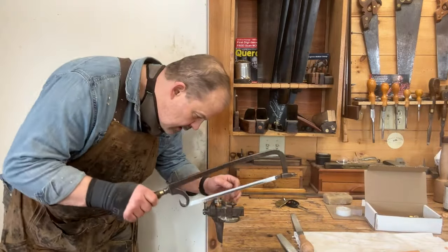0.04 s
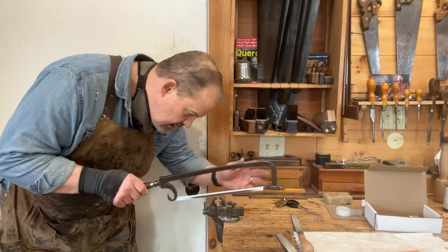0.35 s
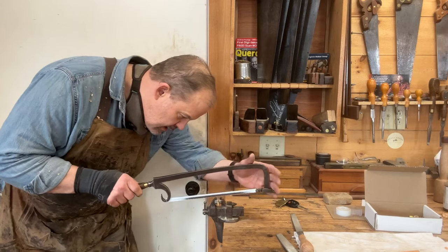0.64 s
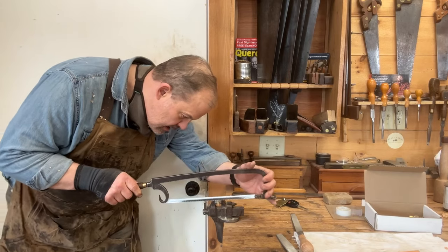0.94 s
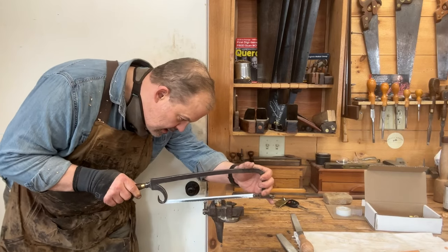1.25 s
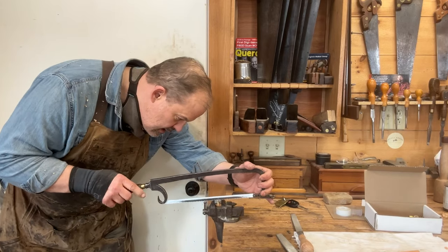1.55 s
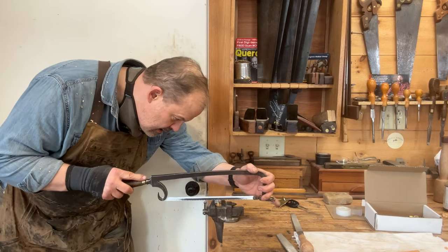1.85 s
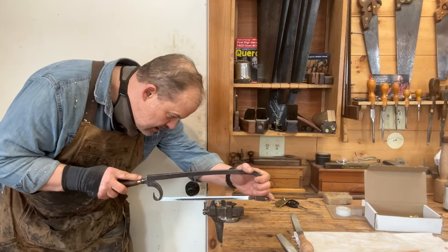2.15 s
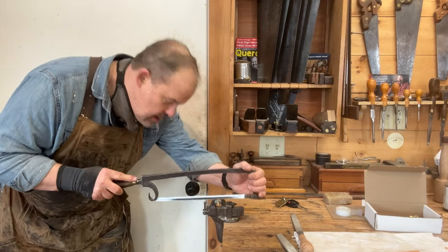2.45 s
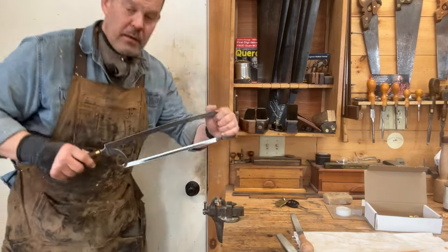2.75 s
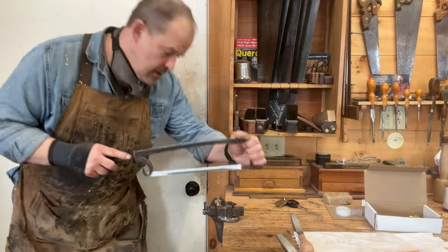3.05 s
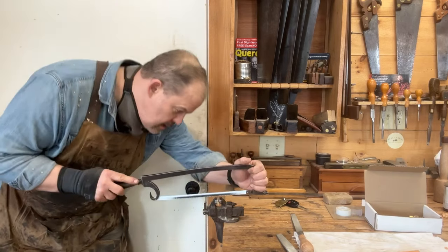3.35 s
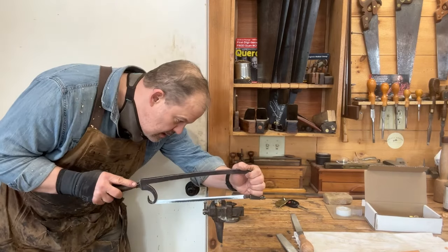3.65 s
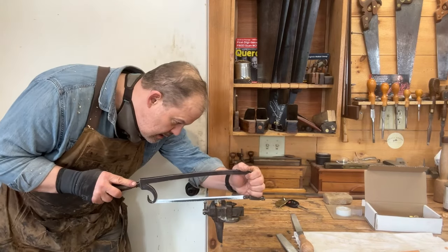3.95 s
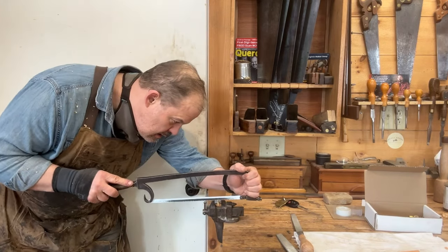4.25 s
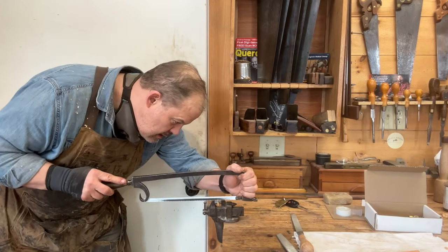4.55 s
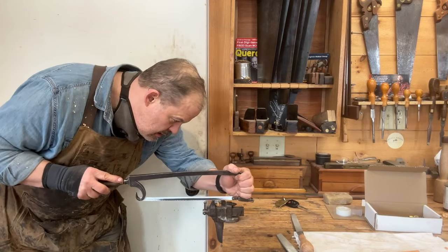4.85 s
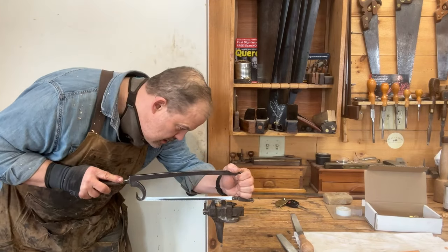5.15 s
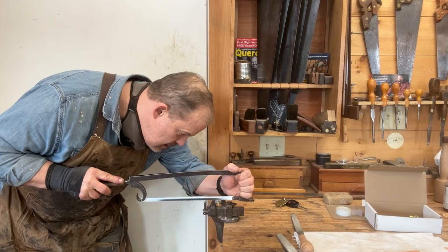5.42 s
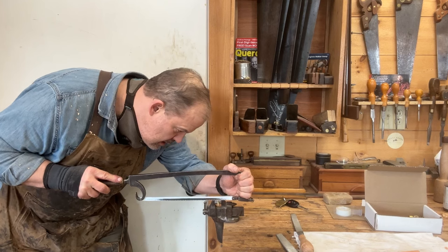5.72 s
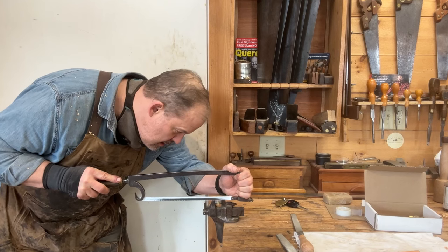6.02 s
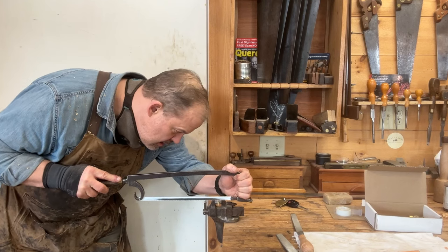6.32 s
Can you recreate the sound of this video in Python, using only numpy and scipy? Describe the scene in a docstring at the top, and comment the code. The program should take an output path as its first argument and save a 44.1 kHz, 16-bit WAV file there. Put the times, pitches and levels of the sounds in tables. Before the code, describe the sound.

In a small workshop, clothes rustle faintly while rubber soles squeak low and a step thumps on floorboards. A hacksaw makes a few quiet scrapes on metal in a vise, then knocks lightly. Another firm, squeaky step follows, and the sawing resumes in short, uneven strokes with little clinks. The steps are much louder than the saw, all heard close up over faint room air.

```python
"""A hacksaw cuts a small brass piece in a bench vise, in short careful strokes, in a wooden workshop.
The teeth catch irregularly, ring frame, vise and blade, and shake the bench. At times the saw knocks
against the vise or the blade snags. The sawyer shifts his stance: clothes rustle and tick, rubber
soles stick and slip, slap the floor and ring the boards. A close microphone pair hears it with the
room and its faint steady air."""
import sys
import numpy as np
from scipy import signal
from scipy.fft import rfft, irfft, next_fast_len
from scipy.io import wavfile
from scipy.ndimage import uniform_filter1d

SR = 44100
rng = np.random.default_rng(int(sys.argv[2]) if len(sys.argv) > 2 else 0)


def waveform_to_disk(signal):
    """Save audio, clipped to [-1, 1], as 16-bit WAV at the path in sys.argv[1]."""
    frames = np.transpose(np.atleast_2d(signal))
    scaled = np.clip(frames, -1, 1) * 32767
    samples = np.round(scaled).astype(np.int16)
    wavfile.write(sys.argv[1], SR, samples)


N = 281358

# Table levels are relative; layer gains follow.
# still shop air: f/Hz, level/dB
AIR_SPECTRUM = [(20, -8), (60, 0), (100, 0), (180, -11), (400, -11), (700, -17), (1200, -17), (1650, -15),
                (2050, -16), (2400, -22), (3200, -29), (6000, -31), (10000, -38), (15000, -48)]
# sliding cloth and shoes: t/s, attack/s, hold/s, release/s, level/dB, sheen/dB re level
RUSTLE_MOVES = [(0.444, 0.0263, 0.058, .11, -52.5, -8.5), (.645, 0.023, 0.03, 0.15, -64.5, -9.5),
                (.942, 0.0093, 0.0065, 0.089, -57.5, -12.5), (0.995, 0.085, 0.074, .04, -52.5, -7.5),
                (1.245, 0.063, 0.12, 0.12, -68, -12.5), (1.44, 0.029, 0.025, 0.19, -63.5, -13.5),
                (1.47, 0.078, .12, 0.068, -69.5, -5), (1.722, 0.17, 0.075, 0.17, -79, -17),
                (2.38, 0.023, 0.032, 0.32, -72.5, -7), (2.449, 0.18, 0.19, 0.13, -68, -7),
                (2.853, 0.036, 0.037, 0.14, -60, -6), (2.99, 0.076, 0.041, 0.066, -55, -1.5),
                (3.265, .06, 0.03, 0.24, -60, -8), (3.39, 0.025, 0.023, 0.064, -76, -7),
                (4.818, 0.044, 0.014, 0.21, -67, -13), (5.467, 0.026, 0.057, 0.065, -70.5, -7)]
# cloth rubbing: f/Hz, level/dB
CLOTH_SPECTRUM = [(40, 13.5), (110, 13.5), (180, 5.5), (280, 13), (550, 3), (1000, 4.5), (2500, 0.5),
                  (4500, -4), (7000, -10), (10000, -32.5)]
# treble sheen of the cloth: f/Hz, level/dB
SHEEN_SPECTRUM = [(3000, -23), (6500, -16.5), (9000, -2), (10500, -7.5), (12000, -18), (15000, -15)]
# apron and handle ticks: t/s, level/dB, decay/s
TICK_EVENTS = [(.465, -48, 0.011), (.669, -48, .0023), (.746, -51.5, 0.0012), (1.275, -49.5, 0.0085),
               (3.497, -52.5, 0.004), (3.681, -63.5, 0.012), (4.575, -68, 0.011), (5.325, -62.5, 0.024),
               (5.553, -50, 0.0021)]
# dry tick: f/Hz, level/dB
TICK_SPECTRUM = [(300, 11), (1200, 12), (3000, 8), (6000, 1), (9500, -1.5), (12000, -8), (15000, -32)]
# juddering sole: t/s, attack/s, hold/s, release/s, level/dB, slip rate/Hz, overtone slope/(dB/octave)
SOLE_SLIDES = [(0.487, .027, 0.0067, .025, -29, 235, -9.5), (.522, .015, .018, .02, -39, 242, -4.5),
               (0.55, 0.022, .004, .072, -28, 242, -19), (1.132, .015, .03, 0.082, -25, 268, -21),
               (3.162, .025, 0.031, 0.079, -23, 227, -14.5)]
# footfalls: t/s, slap/dB, slap decay/s, thud/dB, contact/ms
FOOTFALLS = [(0.534, -76, .012, -28, 3.6), (0.954, -63, 0.0044, -34, 36), (1.052, -52, 0.086, -26, 3.4),
             (1.132, -23, 0.0097, -6, 3.55), (1.179, -40, 0.036, -18.5, 3.5),
             (2.666, -74.5, 0.044, -25.5, 17), (2.975, -57, 0.042, -37.5, 5.6),
             (3.07, -42.5, 0.083, -20, 6.8), (3.113, -35.5, 0.0054, -18.5, 1.9),
             (3.137, -13.5, 0.005, -6, 3.5), (3.191, -42, 0.048, -46, 9.7), (3.375, -78, .02, -31, 5.16),
             (3.604, -65, 0.012, -42, 25), (3.681, -68, 0.043, -53.5, 22), (3.768, -69.5, 0.1, -52, 3.5)]
# sole on wood: f/Hz, level/dB
SOLE_SPECTRUM = [(60, -12.5), (150, 3), (300, 10.5), (800, 4), (1100, 3), (1550, -3), (2200, -2),
                 (2700, -6.5), (3300, -5.5), (4500, -15), (7000, -22), (10000, -32.5), (15000, -56)]
# floorboards: f/Hz, level/dB, T60/s
BOARD_MODES = [(57, -21, 0.62), (92.6, -4, 0.22), (125, -2.5, 0.098), (140.7, -5.5, 0.16),
               (214.7, -1, 0.15), (234.2, -2, 0.23), (266.2, 1.5, 0.16), (296.4, -2.5, 0.19),
               (361.5, -3, 0.14), (426.3, 7, 0.12), (517, -7, .13), (618, 2.5, 0.085), (708, 2.5, 0.24),
               (782, 0, 0.57)]
# short hard ring of floor and room after each sole slap: f/Hz, width/Hz, level/dB
SLAP_RING_MODES = [(770, 30, 4), (870, 30, 5), (1110, 40, 4), (1200, 30, 2), (1290, 30, 0), (1530, 35, -5),
                   (1645, 35, -3), (1900, 40, -4), (2290, 50, -5), (2660, 90, 1), (2780, 110, -1),
                   (2920, 130, -2), (3160, 130, -4), (3863, 70, -6)]
# saw strokes: t/s, attack/s, hold/s, rub/dB, bite/dB re rub, grit/dB re rub, shudder/dB re rub
SAW_STROKES = [(1.905, .046, .10, -45.5, -8.5, -21.5, -11.5), (2.031, 0.1, 0.14, -50.5, 1, -10, 1),
               (2.288, 0.037, 0.0042, -49, -19, -38, -20), (3.952, .06, 0.019, -57.5, -21, -22.5, -3),
               (4.13, 0.099, .13, -45.5, 1, -7.5, -1.5), (4.401, 0.036, 0.044, -51, -13, -40, -8),
               (4.599, 0.12, 0.059, -45, -6.5, -24, -12.5), (4.75, 0.047, 0.017, -47, 6, -7.5, -2.5),
               (5.019, 0.032, .025, -54, -17, -22, -9), (5.119, 0.066, 0.023, -42, -8.5, -22, -16),
               (5.341, 0.036, .005, -52.5, -6, -19, -4), (5.679, 0.026, .115, -66, -8.5, -21.5, 8.5),
               (5.93, 0.037, .015, -64, -2, -14, 0), (6.021, 0.053, 0.038, -63, -11, -38, -2.5),
               (6.314, .048, 0.058, -41, -.5, -11.5, -12)]
# saw knocks against the vise and blade snags: t/s, ring/dB, knock/dB
KNOCKS_AND_SNAGS = [(2.648, -63, -36), (3.375, -77, -49), (4.163, -88.5, -62), (4.238, -48.5, -37.5),
                    (4.601, -60.5, -57), (4.786, -63, -63), (5.129, -69.5, -47), (5.191, -61.5, -46.5),
                    (5.366, -75.5, -43), (5.679, -59.5, -59.5), (5.815, -81, -61), (5.955, -72, -53),
                    (6.36, -46.5, -37.5)]
# bench: f/Hz, width/Hz, level/dB
BENCH_MODES = [(79.8, 5.1, 0), (122.7, 6.6, -6.5)]
# saw frame: f/Hz, width/Hz, level/dB
FRAME_MODES = [(180.5, 20, -2.5), (210.4, 12, -14), (303.8, 23, 5), (333.7, 22, -14), (406.5, 18, -20),
               (409.7, 25.6, 0.5), (488.6, 75, -10)]
# vise on its bench: f/Hz, width/Hz, level/dB
VISE_MODES = [(638.5, 47, 1), (682.5, 25, -4.5), (777.6, 26.7, 2), (810, 15, -1.5), (861.6, 13, 8.5),
              (885, 90, -6.5), (1052, 71, -12), (1210, 99, -10), (1446, 85, -13.5), (1590, 130, -11.5),
              (1650, 250, -13.5), (1880, 37, -27), (2110, 90, -17), (2600, 77, -31)]
# steel blade: f/Hz, width/Hz, level/dB
BLADE_MODES = [(1620, 55, 6), (1875, 45, 5), (2120, 80, 4), (2610, 50, 6), (2780, 80, 4), (2950, 90, 1),
               (3365, 80, -3), (3660, 60, 5), (4100, 250, -4), (4300, 90, 0), (5090, 600, -13),
               (6120, 120, -9), (6770, 110, -12), (7500, 150, -10), (8280, 260, -3.5), (13000, 3000, -22)]
# hiss of the cut: f/Hz, level/dB
CHIP_SPECTRUM = [(400, -20), (1000, 0), (1800, -1), (3000, -4), (6000, -12), (8500, -14), (10000, -21),
                 (15000, -23)]

SWELL_DB = 20  # rise per attack, fall per release
TIME_S = np.arange(N) / SR
CONTROL_TIME_S = TIME_S[::64]
FFT_SIZE = next_fast_len(N + SR)
FREQ_HZ = np.maximum(np.arange(FFT_SIZE // 2 + 1) * SR / FFT_SIZE, 1)


def undb(db):
    """Decibels to gain."""
    return np.exp(np.asarray(db) * (np.log(10) / 20))


def unit(x):
    """Scale to rms 1."""
    return x / np.sqrt(np.mean(abs(x) ** 2))


def shape(x, response):
    """Filter by a frequency response."""
    return irfft(rfft(x, FFT_SIZE) * response, FFT_SIZE)[..., :N]


def colour(points):
    """Causal unit-power response through (f/Hz, level/dB) points."""
    hz, db = np.transpose(points)
    gain = undb(np.interp(np.log(FREQ_HZ), np.log(hz), db))
    cepstrum = irfft(np.log(gain), FFT_SIZE)
    return unit(np.exp(rfft(2 * cepstrum[:FFT_SIZE // 2], FFT_SIZE)))


def body(modes, spread=1.0):
    """Unit-power stereo resonances; higher modes tend to differ more in phase between microphones."""
    response = 0
    for k, (hz, width_hz, db) in enumerate(modes):
        twist_rad = spread * hz / (hz + 500) * rng.uniform(-1.7, 1.7)
        stereo = np.exp(np.array([[1j], [-1j]]) * twist_rad)
        resonance = 1 / (1 + 1j * hz / width_hz * (FREQ_HZ / hz - hz / FREQ_HZ))
        response = response + stereo * (-1) ** (k // 2) * undb(db) * resonance
    return unit(response)


def pair(mid, side, apart_hz):
    """Two close microphones share the bass and hear unrelated treble."""
    apart = FREQ_HZ ** 2 / (FREQ_HZ ** 2 + apart_hz ** 2)
    return mid * np.sqrt(1 - apart / 2) + np.array([[1], [-1]]) * side * np.sqrt(apart / 2)


def walk(rate_hz):
    """Smooth random wander, rms 1."""
    span = max(int(SR / rate_hz), 1)
    steps = np.repeat(rng.standard_normal(N // span + 1), span)
    return unit(uniform_filter1d(steps, span)[:N])


def grains(rate_hz, spread_db):
    """Dense clicks of uneven size, rms 1."""
    clicks = (rng.random(N) < rate_hz / SR) * rng.standard_normal(N)
    return unit(clicks * undb(spread_db * rng.standard_normal(N)))


def bursts(events):
    """Decaying contact noise for each (t/s, level/dB, decay/s)."""
    envelope = sum(undb(db) * (TIME_S >= start_s) * np.exp(-abs(TIME_S - start_s) / decay_s)
                   for start_s, db, decay_s in events)
    return envelope * rng.standard_normal(N)


def swell(start_s, attack_s, hold_s, release_s):
    """Envelope of one movement: eases in, holds, falls linearly in dB."""
    early = np.clip((start_s + attack_s - CONTROL_TIME_S) / max(attack_s, .002), 0, 10)
    late = np.maximum((CONTROL_TIME_S - start_s - attack_s - hold_s) / max(release_s, .002), 0)
    return undb(-SWELL_DB * (early ** 1.3 + late))


def follow(*controls):
    """Interpolate slow controls to the sample rate."""
    return [np.interp(TIME_S, CONTROL_TIME_S, control) for control in controls]


def air(level_db=-74):
    """Faint background noise, wavering slightly."""
    noise = pair(*rfft(rng.standard_normal((2, N)), FFT_SIZE), apart_hz=400)
    hush = unit(irfft(noise * colour(AIR_SPECTRUM), FFT_SIZE)[:, :N])
    return undb(level_db + 1.5 * walk(5.4)) * hush


def rustle():
    """Fibres slip over each other in tiny grains; apron and handle tick."""
    moves = np.array([undb(db) * swell(*timing) for *timing, db, _ in RUSTLE_MOVES])
    glossy = undb(np.array(RUSTLE_MOVES)[:, -1:]) * moves
    slide, gloss = follow(np.linalg.norm(moves, axis=0), np.linalg.norm(glossy, axis=0))
    fibres = grains(rate_hz=15000, spread_db=2) * undb(1.5 * walk(60))
    cloth = undb(5) * shape(fibres * slide, colour(CLOTH_SPECTRUM))
    sheen_grains = grains(rate_hz=6500, spread_db=1.5) * undb(1.7 * walk(40))
    sheen = undb(.5) * shape(sheen_grains * gloss, colour(SHEEN_SPECTRUM))
    ticks = shape(bursts(TICK_EVENTS), colour(TICK_SPECTRUM))
    return cloth + sheen + ticks


def judder(rate_jitter=.045, scuff_db=-17):
    """Sole stick-slip: a wavering buzz, one scuff per slip; the firmest grip sets rate and edge."""
    grips = np.array([undb(db) * swell(*timing) for *timing, db, _, _ in SOLE_SLIDES])
    power = grips ** 2 + 1e-18
    share = power / power.sum(axis=0)
    *_, rates_hz, slopes_db = np.transpose(SOLE_SLIDES)
    grip, slip_hz, slope_db = follow(np.linalg.norm(grips, axis=0), rates_hz @ share, slopes_db @ share)
    phase = 2 * np.pi * np.cumsum(slip_hz * (1 + rate_jitter * walk(120))) / SR
    buzz = sum(undb(slope_db * np.log2(k) + 1.7 * walk(82) * (k > 1)) * np.sin(k * phase)
               for k in range(1, 7))
    slip_noise = (1 + np.cos(phase)) * undb(slope_db / 2) * rng.standard_normal(N)
    scuff = unit(shape(slip_noise, colour(SOLE_SPECTRUM)))
    return (unit(buzz) + undb(scuff_db) * scuff) * grip


def board_thuds(weight_delay_s=.003):
    """The weight follows the slap and rings the boards; longer contact is duller."""
    t = TIME_S[:SR]
    # mode pairs push the air in opposite senses: the boom builds over a few ms
    ring = sum((-1) ** (k // 2) * undb(db) * np.cos(2 * np.pi * hz * t) * undb(-60 * t / t60_s)
               for k, (hz, db, t60_s) in enumerate(BOARD_MODES))
    thuds = np.zeros(N + SR)
    for start_s, _, _, db, contact_ms in FOOTFALLS:
        rise_s = contact_ms / 1000 / 4
        force = t ** 2 * np.exp(-2 * t / rise_s)
        thud = signal.fftconvolve(ring, force)[:SR]
        onset = int((start_s + weight_delay_s) * SR)
        thuds[onset:onset + SR] += undb(db) * thud / abs(thud).max()
    return thuds[:N]


def sole_slaps():
    """The sole slaps the wood; a short hard ring of floor and room follows."""
    contacts = bursts([row[:3] for row in FOOTFALLS])
    ring = undb(-6) * body(SLAP_RING_MODES) / (1 + (FREQ_HZ / 7000) ** 4)
    return shape(contacts, undb(4.5) * colour(SOLE_SPECTRUM) + ring)


def stroke_envelopes(fall_db_per_s=155, clog_db_per_s=35, bite_exponent=1.15, grit_exponent=1.51):
    """Arm effort sets rub, bite, grit and shudder; grit thins as the gullets fill."""
    rub = bite = grit = shudder = 0
    for start_s, attack_s, hold_s, db, bite_db, grit_db, shudder_db in SAW_STROKES:
        effort = swell(start_s, attack_s, hold_s, SWELL_DB / fall_db_per_s)
        clog_db = clog_db_per_s * np.maximum(CONTROL_TIME_S - start_s - attack_s, 0)
        rub = np.hypot(rub, undb(db) * effort)
        bite = np.hypot(bite, undb(db + bite_db) * effort ** bite_exponent)
        grit = np.hypot(grit, undb(db + grit_db - clog_db) * effort ** grit_exponent)
        shudder = np.hypot(shudder, undb(db + shudder_db) * effort)
    return follow(rub, bite, grit, shudder)


def teeth(rate_hz, scatter_db, scrape_db):
    """Each tooth catches once, early or late, with its own force, then scrapes until the next."""
    travel = np.cumsum(rate_hz * np.exp(.3 * walk(150)) / SR)
    tooth = travel.astype(int)
    force = undb(scatter_db * rng.standard_normal(N))[tooth]
    catch = np.diff(tooth, prepend=0) * force / np.sqrt(rate_hz)
    catch -= uniform_filter1d(catch, size=800)
    scrape = force * np.exp(-(travel % 1) / 2.9) * rng.standard_normal(N)
    return unit(unit(catch) + undb(scrape_db) * unit(scrape))


def hacksaw(impact_decay_s=.02):
    """Rub hums in the frame, bite rings the vise, the bench shudders; chips hiss and ring the blade."""
    rub, bite, grit, shudder = stroke_envelopes()
    tooth_hz = 380 * (.5 + (bite / bite.max()) ** .36)  # hardest bite at top blade speed
    drive = teeth(tooth_hz, scatter_db=3, scrape_db=8.5)
    drive *= undb(1.35 * walk(60))  # chatter in the slot
    knocks = bursts([(start_s, db, impact_decay_s) for start_s, _, db in KNOCKS_AND_SNAGS])
    mass_lowpass = 1 / (1 + (FREQ_HZ / 2400) ** 3)
    steel = body(BLADE_MODES, spread=.88)
    bench = undb(1) * shape(drive * shudder, body(BENCH_MODES) * mass_lowpass)
    frame = undb(.52) * shape(drive * rub + knocks, body(FRAME_MODES) * mass_lowpass)
    vise = undb(3) * shape(drive * bite + undb(-8.5) * knocks, body(VISE_MODES) * mass_lowpass)
    blade = shape(drive * grit, undb(-3) * steel + undb(-6) * colour(CHIP_SPECTRUM))
    impacts = bursts([(start_s, db, impact_decay_s) for start_s, db, _ in KNOCKS_AND_SNAGS])
    clinks = shape(impacts, steel + undb(-1) * colour(TICK_SPECTRUM))
    return bench + frame + vise + blade + clinks


def room(x, wet_db, pan_db, lag_ms, bass_t60_s=.34, treble_t60_s=.063):
    """Direct sound at both microphones, then dense echoes from bench and walls."""
    t = TIME_S[:SR]
    noise = rng.standard_normal((2, SR)) * (1 - np.exp(-(t / .0026) ** 2))
    low, high = (rfft(unit(noise * undb(-60 * t / t60_s)) / np.sqrt(SR), FFT_SIZE)
                 for t60_s in (bass_t60_s, treble_t60_s))
    treble = FREQ_HZ / (FREQ_HZ + 3000)
    echoes = pair(*(low * (1 - treble) + high * treble), apart_hz=450)
    sides = np.array([[1], [-1]]) / 2
    direct = undb(sides * pan_db) * np.exp(-2j * np.pi * FREQ_HZ * sides * lag_ms / 1000)
    return shape(x, (direct + undb(wet_db) * echoes) / np.sqrt(1 + undb(wet_db) ** 2))


def scene():
    """The saw is near; footfalls and rustle carry more of the room."""
    thuds, slaps = board_thuds(), sole_slaps()
    return (room(hacksaw(), wet_db=-9, pan_db=1.34, lag_ms=-.06)
            + room(thuds, wet_db=-4.5, pan_db=-1, lag_ms=.53)
            + undb(1.5) * room(slaps, wet_db=1.5, pan_db=4.5, lag_ms=.22)
            + room(judder(), wet_db=-14, pan_db=-2, lag_ms=.3)
            + undb(2) * room(rustle(), wet_db=2, pan_db=2, lag_ms=.0072)
            + air())


def record(dry):
    """Band limit: 44 Hz to 14.3 kHz."""
    highpass = signal.butter(2, 44, "high", fs=SR, output="sos")
    lowpass = signal.ellip(8, .2, 70, 14300, fs=SR, output="sos")
    return signal.sosfilt(lowpass, signal.sosfilt(highpass, dry))


dry = scene()
out = record(dry)
waveform_to_disk(out)
```